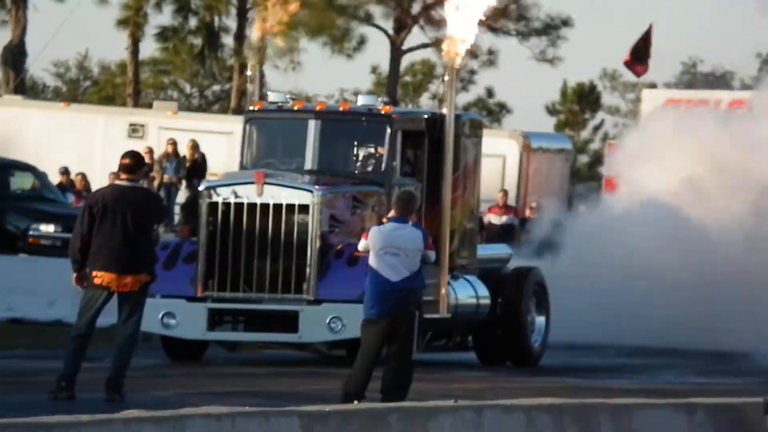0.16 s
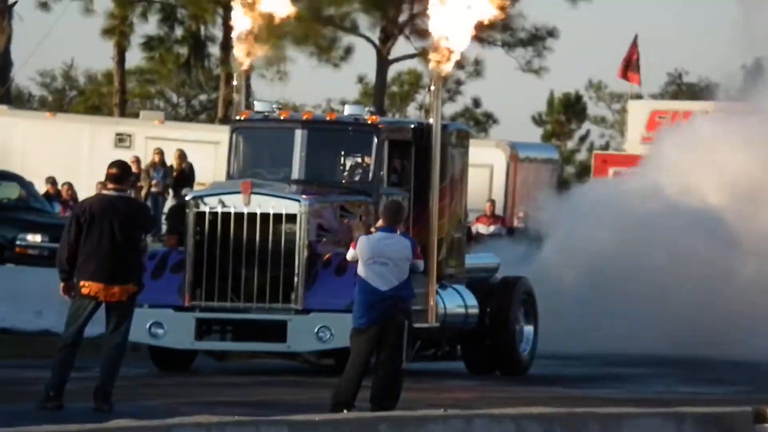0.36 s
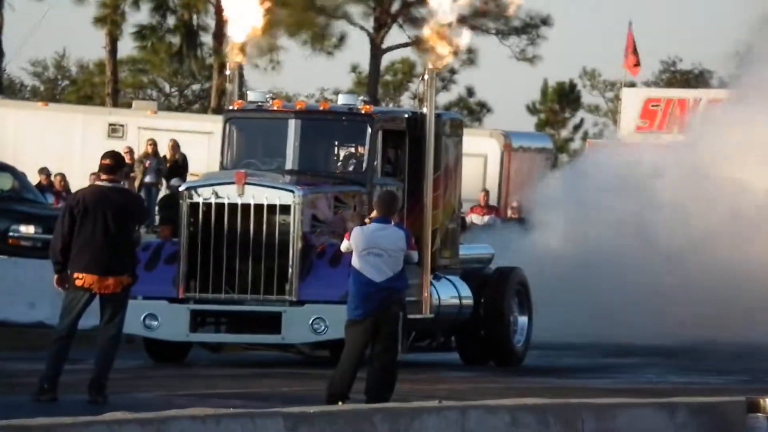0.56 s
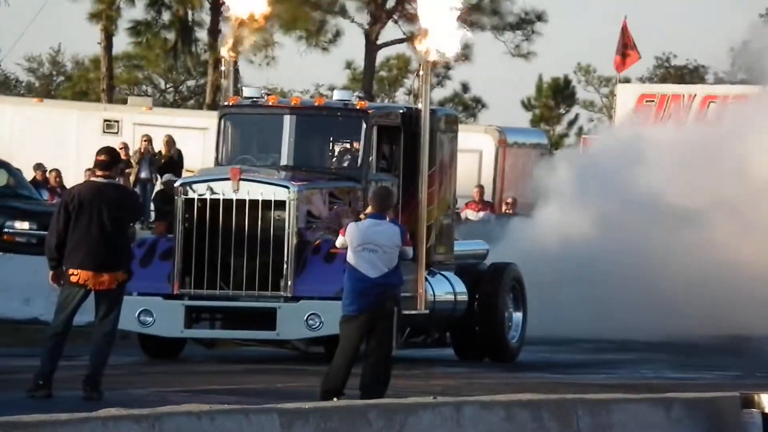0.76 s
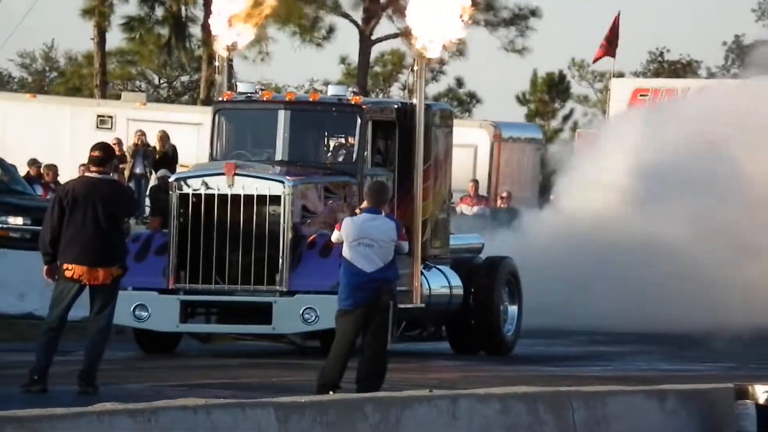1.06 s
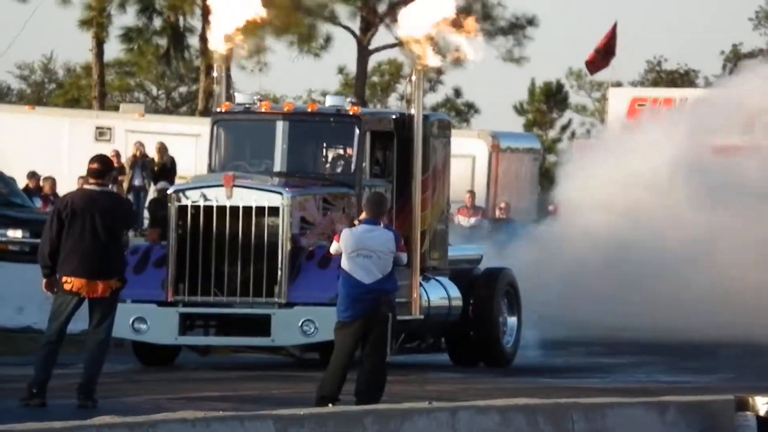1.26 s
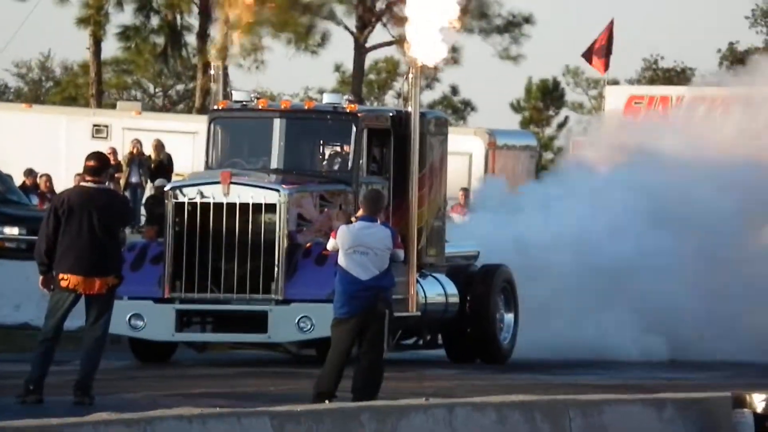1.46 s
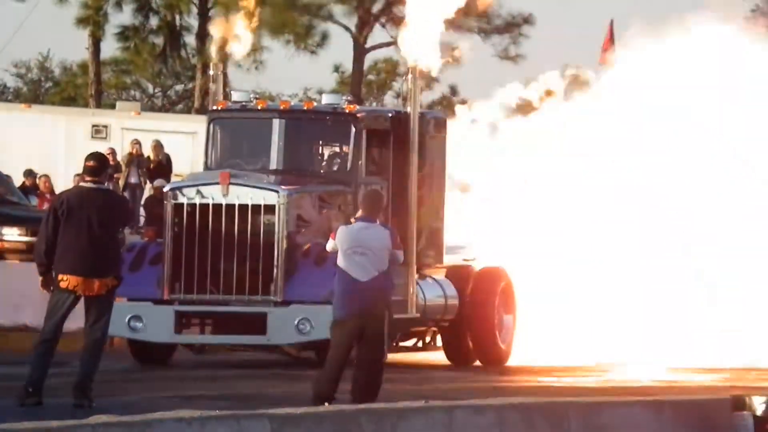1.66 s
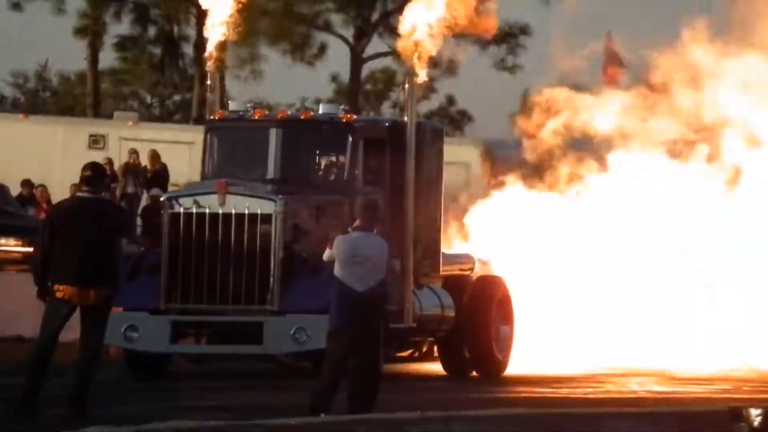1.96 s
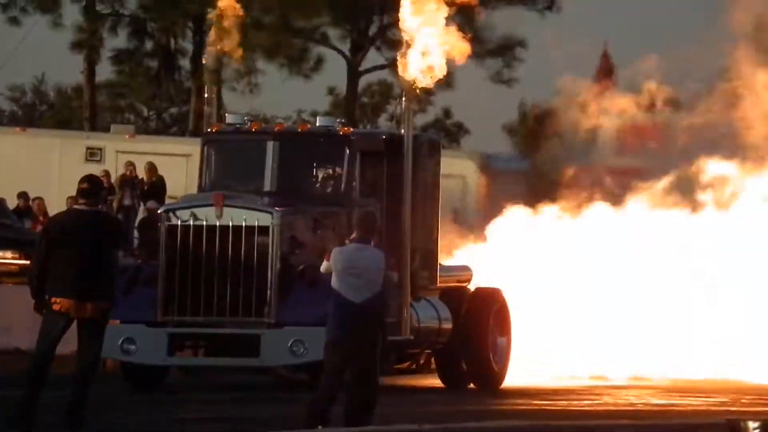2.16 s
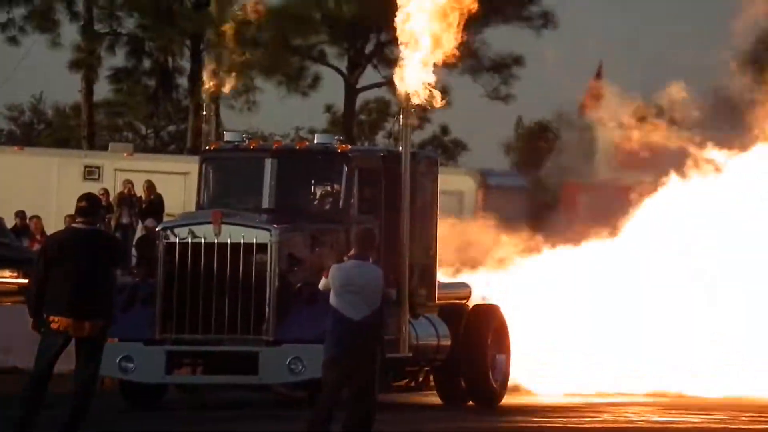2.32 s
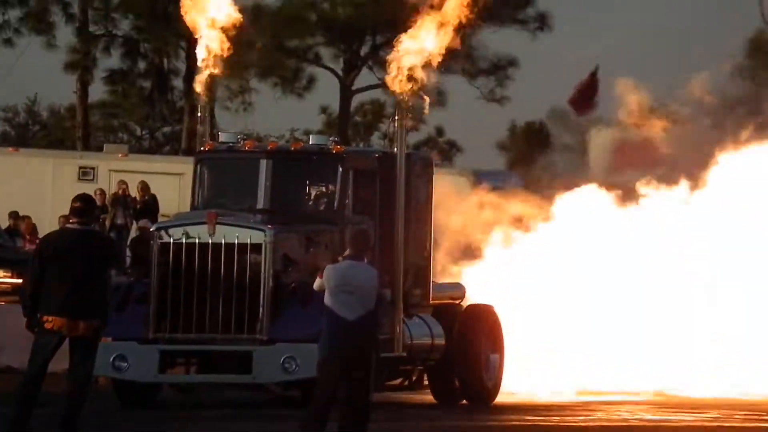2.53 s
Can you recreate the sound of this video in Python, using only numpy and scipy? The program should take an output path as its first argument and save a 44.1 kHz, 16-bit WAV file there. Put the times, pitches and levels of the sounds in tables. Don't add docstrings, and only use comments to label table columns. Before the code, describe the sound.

A steady jet whine over rushing exhaust, a clipped ignition thump, then deep flame rumble and faint whistle

```python
import sys
import numpy as np
from scipy import signal
from scipy.fft import rfft, irfft, next_fast_len
from scipy.io import wavfile

SR = 44100
rng = np.random.default_rng(int(sys.argv[2]) if len(sys.argv) > 2 else 0)


def put_to_file(sound):
    columns = np.atleast_2d(sound).T
    safe = np.clip(columns, -1, 1)
    whole_steps = np.round(safe * 32767)
    wavfile.write(sys.argv[1], SR, whole_steps.astype(np.int16))


def gain_from_db(level_db):
    decades = np.asarray(level_db, float) / 20
    return 10 ** decades


N = 118629

# frequency in Hz, level in dB per Hz.
ROAR_SPECTRUM = [(20, -46), (50, -8), (207, -10), (300, -18.5), (736, -2.5), (920, -6), (1150, -4.5),
                 (1800, -3.5),
                 (2300, -3), (3200, -3), (3750, -6), (4300, -4.5), (5500, -9.5), (7000, -5),
                      (7700, -8.5), (8300, -13.5),
                 (9300, -26), (10500, -19), (11200, -23), (12200, -44), (13300, -26), (14000, -38),
                     (14600, -47), (15300, -64)]
# time in seconds, speed in turns per second.
SHAFT_SPEED = [
    (0, 289.1),
    (.22, 289.4),
    (.55, 290.8),
    (.78, 289.3),
    (1.06, 286.2),
    (1.4, 280.6),
    (1.75, 282.2),
    (2.05, 283.9),
    (2.4, 281),
    (2.69, 283),
]
# time in seconds, blade tone in dB, its octave in dB, exhaust roar in dB.
SPOOL_LEVELS = [(0, -15, -33, -29.5), (.3, -16.5, -29, -29), (.7, -16, -37, -30.5), (1.03, -17, -30, -28.5),
                (1.18, -18, -26, -29), (1.29, -20, -33, -27), (1.35, -30, -38, -26), (1.4, -21, -38, -25),
                (1.64, -27, -35, -25), (1.78, -23, -32, -25.5), (1.9, -21, -35, -27),
                (2.17, -18, -34, -26.5), (2.28, -30, -35, -25), (2.4, -30, -26, -24.5),
                (2.52, -30, -34, -24.5), (2.6, -18, -33, -26), (2.69, -19, -33, -27)]
# shaft order, level at high spool in dB, level at low spool in dB.
SHAFT_ORDERS = [(4, -47, -39.5), (6, -41.5, -45), (9, -53, -28), (10, -32.5, -31), (11, -31.5, -45),
                (15, -58, -46.5), (16, -48, -34.5), (18, -49.5, -37.5), (20, -29, -52), (21, -24.5, -48.5),
                (24, -36, -42)]
# time in seconds, centre in Hz, level in dB.
WHISTLE_GLIDE = [
    (1.56, 5550, -40),
    (1.6, 5880, -32),
    (1.65, 6300, -34),
    (1.73, 6600, -33),
    (1.9, 6830, -38),
    (2.04, 6870, -33),
    (2.18, 6580, -37),
    (2.3, 6500, -43),
    (2.42, 6680, -35),
    (2.69, 6950, -37),
]
# time in seconds, pressure in capsule rails.
BLAST_WAVE = [(1.782, 0), (1.7975, -.95), (1.7985, -1.9), (1.8078, -1.9), (1.8082, -.1), (1.8088, .55),
              (1.8099, 1.15), (1.8105, 2.5), (1.8180, 1.9), (1.823, -.75), (1.828, .4), (1.8338, 1.0),
              (1.835, 2), (1.839, 1.9), (1.8415, 1.1), (1.8450, 1.0), (1.8485, -.75), (1.855, .7),
              (1.861, -.3), (1.870, .6), (1.876, -.9), (1.877, -1.17), (1.882, -1.17), (1.885, -.3),
              (1.896, .6), (1.902, -.7), (1.905, .3), (1.908, -.3), (1.911, .95), (1.917, -.6)]
# frequency in Hz, level in dB per Hz.
FLAME_SPECTRUM = [(20, -40), (36, -13), (53, -10.5), (90, -2.5), (118, -5), (200, -5), (264, -20),
                  (500, -25.5)]
# frequency in Hz, left minus right in dB.
PORT_DIFF = [(200, 0.5), (1500, .5), (2000, -5), (2500, -8), (3100, 6), (3600, 2), (4000, -7.5),
             (4650, -3),
             (5200, -6.5), (6000, -3), (6400, 11), (7300, -3), (8500, 5.5), (9500, 23), (10200, 5),
                  (10600, 0)]
# frequency in Hz, lead of left in radians.
PORT_LEAD = [(1500, 0.059), (2050, -0.68), (2750, 1.24), (3600, -1.4), (4500, 1.1), (5000, 1.37),
             (9300, 0.029), (10200, 0)]
# frequency in Hz, likeness from 0 to 1.
PORT_LIKENESS = [(200, 0.98), (1200, 0.93), (2400, 0.76), (3400, 1), (4700, 0.84), (6600, 0.51),
                 (9500, 0.94), (10600, .98)]
# centre in Hz, width in Hz.
BODY_DIPS = [(7900, 750), (8740, 600), (8860, 440), (11600, 630), (11850, 670)]

ROAR_DB, GUST_DB, SWELL_DB = 6.5, .9, 1.0
HISS_FROM_HZ, HISS_FOLLOWS, HISS_SINKS_DB = 3000, 0.44, -2.5
BLADE_ORDER, HIGH_SPOOL_HZ, LOW_SPOOL_HZ = 7, 294.6, 283.6
SHAFT_JITTER = .0003
BLADE_FLICKER_DB, SLOW_FLICKER_DB, TONE_FLICKER_DB, PHASE_WANDER_RAD = .7, 1.6, 3.0, .7
WHISTLE_WIDTH_HZ = 35
LIGHT_OFF_S, FLAME_ON_S, FLAME_RISE_S = 1.8, 1.89, 0.027
FLAME_DB, FLARE_DB, FLARE_S = -17, 3, .1
RAIL, KNEE = 1.15, 14.0
LOW_CUT_HZ, TOP_CUT_HZ = 130, 15300


def in_time(rows):
    s, *columns = np.transpose(rows)
    return [np.interp(np.arange(N) / SR, s, column) for column in columns]


def at_hz(points, hz):
    point_hz, value = np.transpose(points)
    return np.interp(np.log(hz + 1), np.log(point_hz), value)


def rms_one(x):
    return x / np.sqrt(np.mean(x ** 2))


def drift(rate_hz):
    r = np.exp(-2 * np.pi * rate_hz * 20 / SR)
    white = rng.standard_normal(N // 20 + 4002)
    slow = signal.lfilter([1], [1, -2 * r, r * r], white)[4000:]
    return np.interp(np.arange(N) / 20, np.arange(len(slow)), rms_one(slow - slow.mean()))


def lit(on_s):
    return np.clip((np.arange(N) / SR - on_s) / FLAME_RISE_S, 0, 1)


def jet_noise(spectrum, swing_db):
    size = next_fast_len(N)
    hz = np.arange(size // 2 + 1) * SR / size
    safe_hz = np.maximum(hz, 20)
    noise = rfft(rng.standard_normal((3, size))) * gain_from_db(at_hz(spectrum, hz)) * (hz > 20)
    noise /= np.sqrt(np.mean(irfft(noise[0], size) ** 2))
    alike = np.clip(at_hz(PORT_LIKENESS, hz), 0, 1)
    noise *= np.sqrt([alike, 1 - alike, 1 - alike])
    noise *= 1 + (LOW_CUT_HZ / safe_hz) ** 2
    out = np.zeros((3, N))
    place = 2 * np.log2(safe_hz / 20)
    for k in range(int(2 * np.log2(spectrum[-1][0] / 20)) + 2):
        band = np.cos(np.pi / 2 * np.clip(place - k, -1, 1)) ** 2
        level_db = swing_db(20 * 2 ** (k / 2)) + SWELL_DB * drift(7)
        out += irfft(noise * band, size)[:, :N] * gain_from_db(level_db)
    return out


def roar(roar_db):
    mean_db = roar_db.mean()
    hiss_db = mean_db + HISS_FOLLOWS * (roar_db - mean_db) + HISS_SINKS_DB * lit(LIGHT_OFF_S)
    spectrum = ROAR_SPECTRUM
    return jet_noise(spectrum, lambda hz: ROAR_DB + (hiss_db if hz > HISS_FROM_HZ else roar_db))


def whine(shaft_hz, blade_db, octave_db):
    turn = 2 * np.pi * np.cumsum(shaft_hz * (1 + SHAFT_JITTER * drift(27.0))) / SR
    slow = np.clip((HIGH_SPOOL_HZ - shaft_hz) / (HIGH_SPOOL_HZ - LOW_SPOOL_HZ), 0, 1)
    flicker_db = BLADE_FLICKER_DB + SLOW_FLICKER_DB * slow
    out = gain_from_db(blade_db + flicker_db * drift(68.0)) * np.sin(BLADE_ORDER * turn)
    out += gain_from_db(octave_db + flicker_db * drift(45.0)) * np.sin(2 * BLADE_ORDER * turn)
    for order, high_db, low_db in SHAFT_ORDERS:
        db = high_db + (low_db - high_db) * slow + TONE_FLICKER_DB * drift(6.3)
        phase = rng.uniform(0, 2 * np.pi) + PHASE_WANDER_RAD * drift(20.5)
        out += gain_from_db(db) * np.sin(round(order) * turn + phase)
    return np.sqrt(2) * out


def whistle():
    hz, db = in_time(WHISTLE_GLIDE)
    turn = 2 * np.pi * np.cumsum(hz) / SR
    on = np.arange(N) / SR > WHISTLE_GLIDE[0][0]
    in_phase = (1 + .5 * drift(WHISTLE_WIDTH_HZ)) * np.sin(turn)
    quadrature = .5 * drift(WHISTLE_WIDTH_HZ) * np.cos(turn)
    return on * gain_from_db(db) * (in_phase + quadrature)


def pressure_wave():
    rest = (BLAST_WAVE[-1][0] + .008, 0)
    return RAIL * in_time(BLAST_WAVE + [rest])[0]


def flame():
    since_s = np.maximum(np.arange(N) / SR - FLAME_ON_S, 0)
    flame_db = FLAME_DB + FLARE_DB * np.exp(-since_s / FLARE_S)
    return lit(FLAME_ON_S) * jet_noise(FLAME_SPECTRUM, lambda hz: flame_db)


def ports(rows):
    size = next_fast_len(N + 4096)
    hz = np.arange(size // 2 + 1) * SR / size
    level = gain_from_db(at_hz(PORT_DIFF, hz) / 2)
    side = level * np.exp(.5j * at_hz(PORT_LEAD, hz))
    return irfft(rfft(rows[0] + rows[1:], size) * [side, 1 / side], size)[:, :N]


def scene():
    shaft_hz, = in_time(SHAFT_SPEED)
    blade_db, octave_db, roar_db = in_time(SPOOL_LEVELS)
    gust = gain_from_db(GUST_DB * (drift(25) + drift(110)))
    engine = roar(roar_db) * gust + flame()
    engine[0] += whine(shaft_hz, blade_db, octave_db) + whistle()
    return ports(engine) + pressure_wave()


def low_cut():
    r = np.exp(-2 * np.pi * LOW_CUT_HZ / SR)
    return [1, -2, 1], [1, -2 * r, r * r]


def band_limit(x):
    return signal.sosfilt(signal.butter(12, 15060, fs=SR, output="sos"), x)


def record(dry):
    x = dry / (1 + np.abs(dry / RAIL) ** (2 * KNEE)) ** (.5 / KNEE)
    for hz, width_hz in BODY_DIPS:
        x = signal.lfilter(*signal.iirnotch(hz, hz / width_hz, fs=SR), x)
    x = signal.lfilter(*low_cut(), x)
    x = signal.sosfilt(signal.cheby2(8, 50, TOP_CUT_HZ, fs=SR, output="sos"), x)
    mix = np.clip(x, -1, 1)
    return band_limit(mix)


dry = scene()
out = record(dry)
put_to_file(out)
```